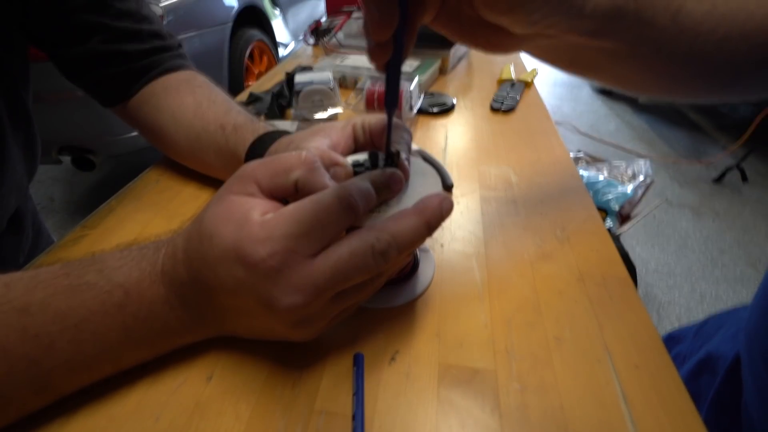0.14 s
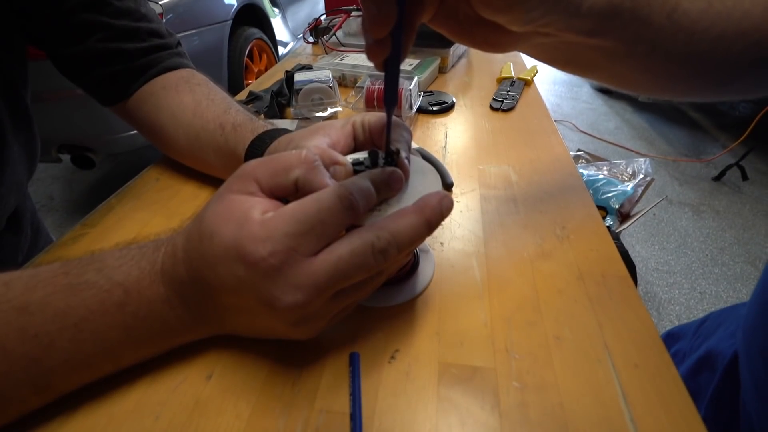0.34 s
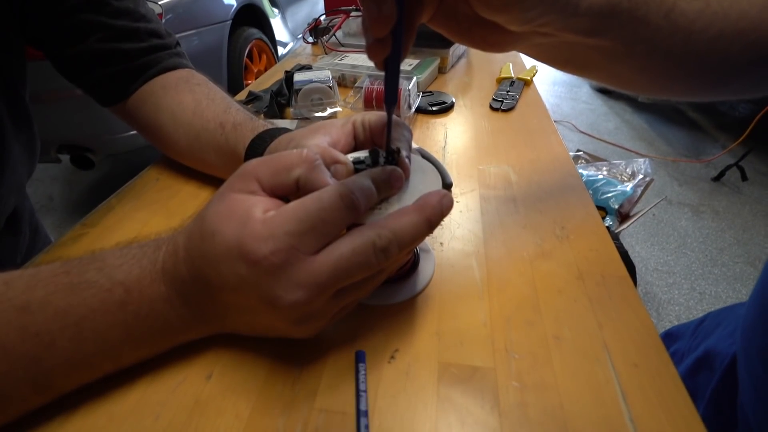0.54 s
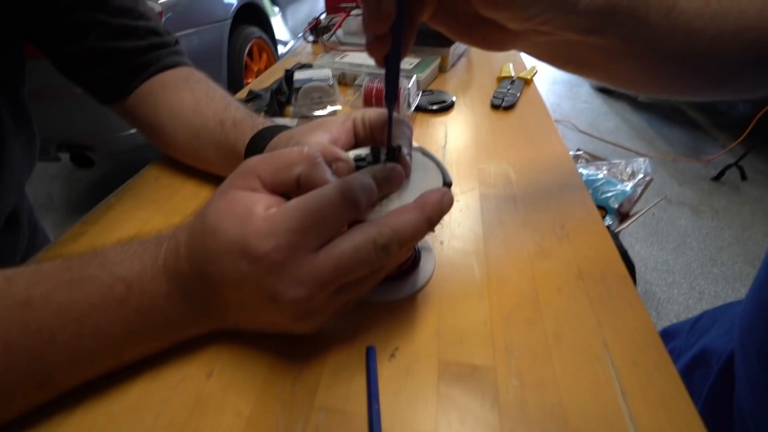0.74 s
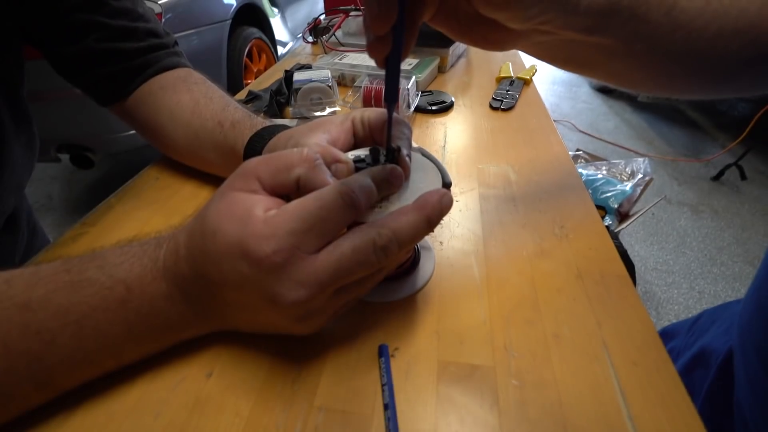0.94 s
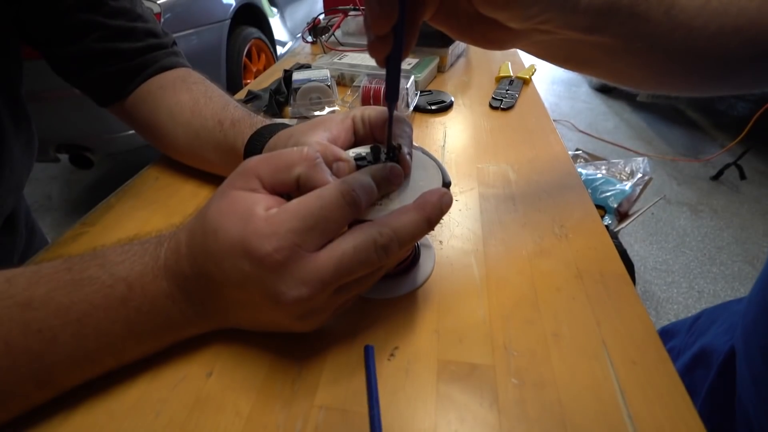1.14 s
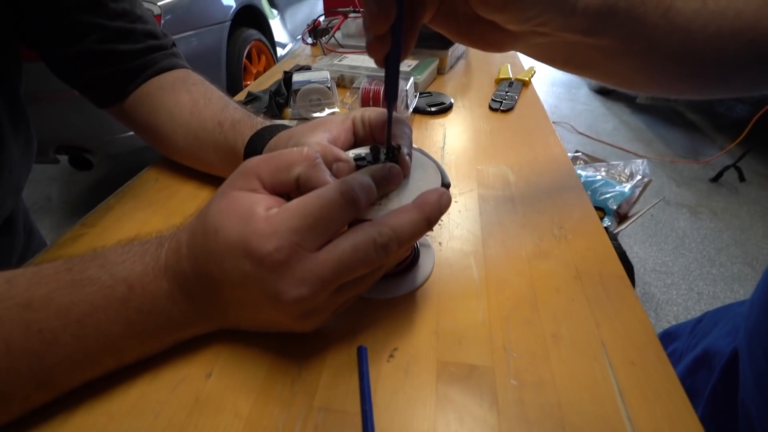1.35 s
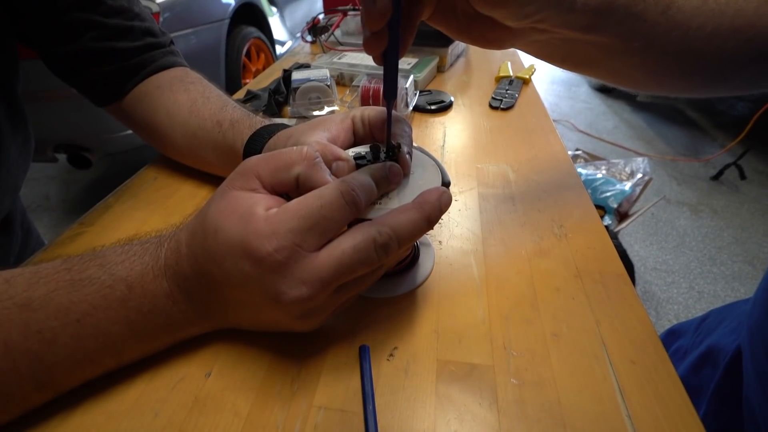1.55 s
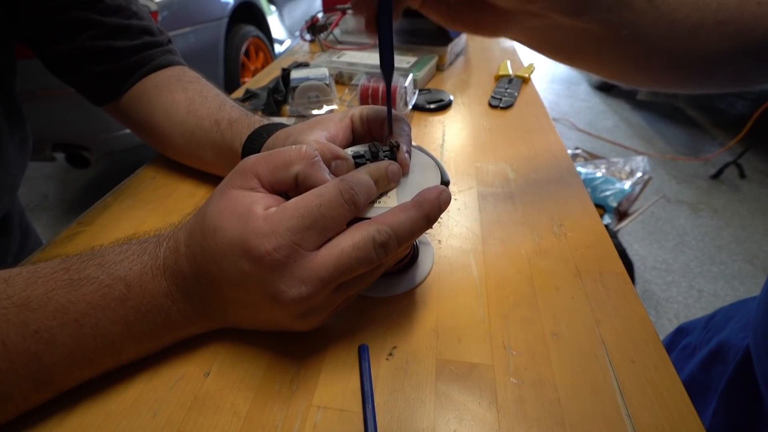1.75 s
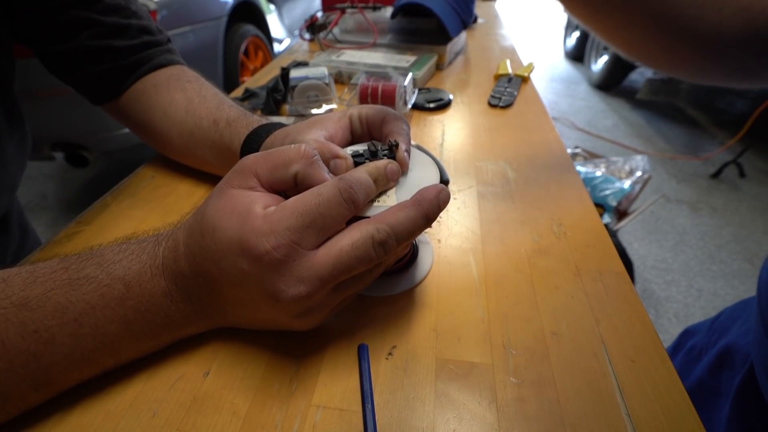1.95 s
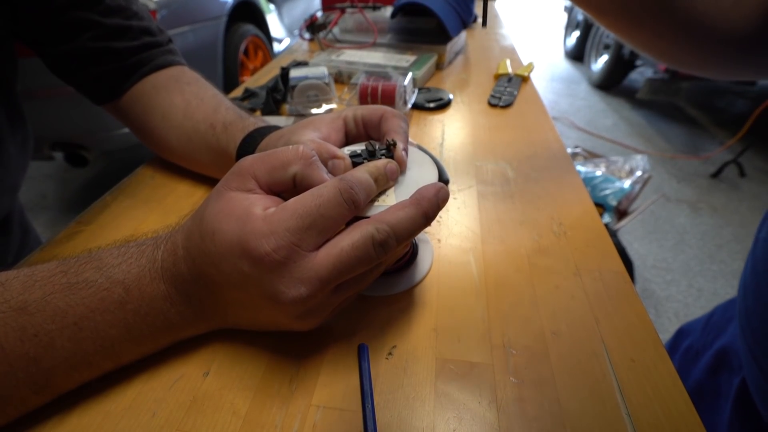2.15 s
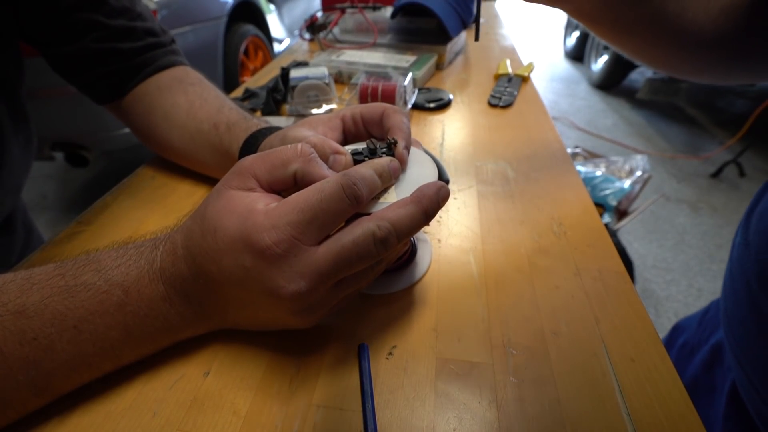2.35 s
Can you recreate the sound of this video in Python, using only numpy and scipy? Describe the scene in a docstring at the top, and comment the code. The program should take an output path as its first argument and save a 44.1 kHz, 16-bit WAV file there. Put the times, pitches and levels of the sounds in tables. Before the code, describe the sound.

A hammer hits a hand-held steel punch five times at an even quick pace, each blow a hard clack with woody bench thump and loose-part rattle, then quiet garage noise; close microphone overloads.

```python
"""Garage, wooden workbench: a hammer taps a steel punch in six quick, nearly even blows.
Bench: damped thump, struck modes and dense noise ring. Punch: short steel modes plus a noise crack.
Hammer: faint beating mode pairs. Loose things: clusters of tiny noise clicks. Bounces: later knocks.
Behind them lie low room noise and a faint hiss. The close microphone overloads: a late limiter
and hard clipping shape the blows. The first blow falls just before the start."""
import sys
import numpy as np
from scipy import signal
from scipy.fft import rfft, irfft
from scipy.io import wavfile

SR = 44100
rng = np.random.default_rng(int(sys.argv[2]) if len(sys.argv) > 2 else 0)


def generate_wav(signal):
    """Clip the signal to [-1, 1] and save it as 16-bit WAV at the path in sys.argv[1]."""
    frames = np.transpose(np.atleast_2d(signal))
    scaled = np.clip(frames, -1, 1) * 32767
    pcm = np.round(scaled).astype(np.int16)
    wavfile.write(sys.argv[1], SR, pcm)


N = 110250
T = np.arange(SR) / SR  # time axis of one struck sound, s

# All mode and spectrum levels are relative; noise spectra are scaled to rms 1.
# Hammer blows: start_s, bench_db, tick_db, rattle_db, ring_held_s, low_ring_db, mid_ring_db, high_ring_db
BLOWS = [(-.095, -2.76, -2, -4, .2, -24, -24, -27), (0.2023, -0.27, 0.5, -3.5, .2, -11, -19, -20),
         (0.4945, 1.2, 2.5, -2, .14, -2, -6.5, -4), (0.7839, 3.16, 5, 0, 0.17, 3, -1, -4),
         (1.0504, 2.26, 6, 0, .3, 2, -1, -10), (1.3544, -1.95, 0.5, -5.5, 0.15, 3, -7, -12)]
# Hammer bounces and small knocks after the blows: start_s, click_db, push_db
BOUNCE_KNOCKS = [(.255, -16, 0), (.5535, 2, 3), (.585, -11, -10), (.863, -1.5, -2), (.918, -11, -8),
                 (1.1255, -4, -1), (1.161, -4, -10), (1.184, -11, -14), (1.208, -14, -12), (1.403, -7, -6),
                 (1.43, -10, -10), (1.468, -16, -18), (2.041, -24, -40)]
# Damped give of stand and bench: freq_hz, level_db, t60_s
THUMP_MODES = [(155.6, -5.5, 0.059), (305, 4, 0.015), (64.5, -5, 0.025), (483, -4, 0.024), (846, -8, 0.062)]
# Bench top modes: freq_hz, level_db, t60_s
BENCH_MODES = [(86, -13, .38), (122, -14, .33), (159, -14, .6), (179, -8, .5), (208, -16, .42),
               (265, -8, .36), (282, -10, .6), (298, -16, .6), (362, -1, .34), (416, -11, .55),
               (445, -8, .38), (476, -13, .4), (502, -11, .45), (541, -13, .42), (591, -10, .38),
               (766, -6, .38), (816, -6.5, .42), (869, -11, .38), (968, -10, .3), (989, -5, .3),
               (1048, -18, .3), (1101, -19, .3)]
# Dense ring of bench and garage: freq_hz, level_db
BODY_SPECTRUM = [(30, -10), (80, 7.5), (160, 0.5), (230, 1), (400, -1), (560, 2), (660, -4), (800, 2.5),
                 (1000, -6), (1200, -13), (1750, -19.5), (2300, -25), (4000, -29), (7000, -36),
                 (11000, -41), (16000, -58)]
# Decay of the dense ring: freq_hz, t60_s
BODY_DECAY = [(80, 0.15), (200, 1), (500, 0.58), (1000, 0.48), (2000, 0.88), (5000, 0.53), (10000, 0.36),
              (16000, 0.53)]
# Short steel modes of the punch: freq_hz, level_db, t60_s
PUNCH_MODES = [(1735, -6, 0.039), (2470, -18.5, 0.042), (3340, -1, 0.0051), (4280, -7, 0.0075),
               (5230, -12.5, 0.0023), (6900, -13.5, 0.003), (9580, -19.5, 0.0046), (13500, -24, 0.0074)]
# Crack and tick scattered from nearby things: freq_hz, level_db
SCATTER_SPECTRUM = [(500, 5), (1700, 13), (4000, -10), (7000, 1.5), (11300, -16.5), (12500, -10),
                    (14000, -2), (16000, -67)]
# Hammer head modes in low, middle and high families: freq_hz, level_db, t60_s
HAMMER_FAMILIES = [
    [(3140, 0, 1.1), (3316, -11, .8)],
    [(6848, 0, 1.6), (6918, -1, 1.6)],
    [(9227, 0, 1.4), (9281, -5, 1.4), (15130, -14, .35)],
]
# Clatter of small loose parts: freq_hz, level_db
CLATTER_SPECTRUM = [(200, -34), (900, 19), (1800, -2.5), (2600, 4.5), (4000, -2), (5500, -6), (9000, -13.5),
                    (12000, -21), (16000, -26)]
# Click of a bounce: freq_hz, level_db
KNOCK_SPECTRUM = [(200, -17), (900, 10.5), (1850, 7), (2600, 0.5), (4000, -7), (6000, -17.5), (9000, -53),
                  (16000, -40)]
# Garage background: freq_hz, level_db
FLOOR_SPECTRUM = [(15, -50), (25, -26), (43, -8), (161, -2), (293, -9.5), (394, -13.5), (427, -9.5),
                  (545, -6), (863, -13.5), (1020, -12.5), (1480, -19.5), (4370, -33), (16000, -54.5)]
# Garage background envelope: time_s, level_db
FLOOR_ENVELOPE = [(0, -40), (1.5, -40.5), (1.85, -43.5), (2.101, -43.5), (2.25, -42), (2.5, -42)]
# Faint hiss: freq_hz, level_db
HISS_SPECTRUM = [(800, -81), (2500, 28.5), (5000, 20), (8000, 19.5), (10000, 8.5), (16000, -18)]
# Hiss envelope: time_s, level_db
HISS_ENVELOPE = [(0, -55.5), (.45, -58), (1.2, -54), (1.7, -76)]

THUMP_GAIN_DB, MODES_GAIN_DB, BODY_GAIN_DB = 1.5, -12, -13.5
BENCH_DELAY_S, MODES_RISE_S = .001, .0095
BODY_CHANGE = .7  # amplitude share of the dense ring that is new at each blow
TICK_GAIN_DB = -13.5
CRACK_GAIN_DB, CRACK_T60_S = -11.5, .0024
SCATTER_GAIN_DB, SCATTER_T60_S = -22, .035
HAMMER_GAIN_DB = -46
LIFT_S, LIFT_START_GAIN, SWING_AWAY_T60_S = .125, .18, .42
RATTLE_GAIN_DB, RATTLE_SCATTER_DB = -27.5, 3.5  # per part
RATTLE_AFTER_S, RATTLE_SPREAD_S = .042, .0068  # time in the air and its spread
RATTLE_RISE_S, RATTLE_T60_S = .00013, .018
KNOCK_GAIN_DB, KNOCK_RISE_S, KNOCK_T60_S = -13, .00058, .027
PUSH_GAIN_DB, LIGHT_PUSH_HZ = -20, 920  # bench hardly answers a light push below this
LIMIT_DB, LIMIT_SHARE = -7, .58  # threshold; ducked share of the overshoot in dB
HELD_LEVEL_FALL_DB_PER_S = 234
CLIP_LEVEL, LOW_CUT_HZ, EDGE_HZ = 1, 35, 15800


def amp(db):
    """Decibels to gain."""
    return 10 ** (np.asarray(db) / 20)


def unit(x):
    """Scales to rms 1."""
    return x / np.sqrt(np.mean(x ** 2) + 1e-20)


def read(points, hz):
    """Interpolates a table along a log-frequency axis."""
    f, value = np.transpose(points)
    return np.interp(np.log(hz + 1), np.log(f + 1), value)


def add(mix, start_s, sound):
    """Mixes in a sound at start_s, which may lie before the start."""
    at = round(start_s * SR)
    sound = sound[max(-at, 0):]
    part = mix[max(at, 0):][:len(sound)]
    part += sound[:len(part)]


def noise(spectrum, size):
    """Filters white noise to a spectrum, rms 1."""
    bins = rfft(rng.standard_normal(size))
    hz = np.fft.rfftfreq(size, 1 / SR)
    return unit(irfft(bins * amp(read(spectrum, hz)), size))


def dying(t_s, t60_s):
    """Exponential decay, 60 dB in t60_s."""
    return np.exp(-np.log(1000) * t_s / t60_s)


def ring(modes):
    """Sums decaying sines of alternating polarity."""
    out = np.zeros(SR)
    for k, (hz, level_db, t60_s) in enumerate(modes):
        out += (-1) ** k * amp(level_db) * dying(T, t60_s) * np.sin(2 * np.pi * hz * T)
    return out


def dense_ring():
    """Countless weak modes of bench and room as noise, each band dying at its own speed."""
    hz, t_s, bands = signal.stft(noise(BODY_SPECTRUM, SR), SR, nperseg=512)
    decay = dying(t_s, read(BODY_DECAY, hz)[:, None])
    return signal.istft(bands * decay, SR, nperseg=512)[1][:SR]


def bench():
    """Each blow pushes the same spot: a thump, then modes build up with a partly new dense ring."""
    thump = amp(THUMP_GAIN_DB) * ring(THUMP_MODES)
    modes = amp(MODES_GAIN_DB) * ring(BENCH_MODES) * (1 - np.exp(-T / MODES_RISE_S))
    same_share = np.sqrt(1 - BODY_CHANGE ** 2)  # keeps total power
    same = thump + modes + amp(BODY_GAIN_DB) * same_share * dense_ring()
    out = np.zeros(N)
    for start_s, bench_db, *_ in BLOWS:
        fresh = amp(BODY_GAIN_DB) * BODY_CHANGE * dense_ring()
        add(out, start_s + BENCH_DELAY_S, amp(bench_db) * (same + fresh))
    return out


def punch():
    """Steel meets hand-damped steel: a tick, a short noise crack at the thump's start, and their scatter."""
    out = np.zeros(N)
    tick = amp(TICK_GAIN_DB) * ring(PUNCH_MODES)
    crack = amp(CRACK_GAIN_DB) * dying(T, CRACK_T60_S)
    scatter = amp(SCATTER_GAIN_DB) * dying(T, SCATTER_T60_S)
    for start_s, _, tick_db, *_ in BLOWS:
        add(out, start_s, amp(tick_db) * tick)
        burst = (crack + scatter) * noise(SCATTER_SPECTRUM, SR)
        add(out, start_s + BENCH_DELAY_S, amp(tick_db) * burst)
    return out


def hammer():
    """Close head modes beat, swelling as the head lifts and fading as it swings away."""
    out = np.zeros(N)
    families = np.array([ring(modes) for modes in HAMMER_FAMILIES])
    lift = LIFT_START_GAIN + (1 - LIFT_START_GAIN) * np.minimum(T / LIFT_S, 1) ** 2
    for start_s, _, _, _, held_s, *ring_db in BLOWS:
        away = dying(np.maximum(T - held_s, 0), SWING_AWAY_T60_S)
        head = amp(ring_db) @ families
        add(out, start_s, amp(HAMMER_GAIN_DB) * head * lift * away)
    return out


def click(spectrum, rise_s, t60_s):
    """Small damped impact: decaying noise with a soft start."""
    t_s = T[:4096]
    soft_start = 1 - np.exp(-(t_s / rise_s) ** 2)
    return noise(spectrum, 4096) * dying(t_s, t60_s) * soft_start


def knocks():
    """Later knocks: a click and a light push on the upper bench modes."""
    out = np.zeros(N)
    high_pass = signal.butter(2, LIGHT_PUSH_HZ, "high", fs=SR)
    upper_modes = signal.lfilter(*high_pass, ring(BENCH_MODES))
    for start_s, click_db, push_db in BOUNCE_KNOCKS:
        impact = click(KNOCK_SPECTRUM, KNOCK_RISE_S, KNOCK_T60_S)
        add(out, start_s, amp(KNOCK_GAIN_DB + click_db) * impact)
        add(out, start_s, amp(PUSH_GAIN_DB + push_db) * upper_modes)
    return out


def rattle():
    """Small parts jump at each blow and land in a dense cluster of 36 clicks."""
    out = np.zeros(N)
    for start_s, _, _, rattle_db, *_ in BLOWS:
        for late, size in rng.standard_normal((36, 2)):
            gain = amp(RATTLE_GAIN_DB + rattle_db + RATTLE_SCATTER_DB * size)
            land_s = start_s + RATTLE_AFTER_S + RATTLE_SPREAD_S * late
            add(out, land_s, gain * click(CLATTER_SPECTRUM, RATTLE_RISE_S, RATTLE_T60_S))
    return out


def background(spectrum, envelope):
    """Steady shaped noise under a slow level envelope."""
    level_db = np.interp(np.arange(N) / SR, *np.transpose(envelope))
    return noise(spectrum, N) * amp(level_db)


def garage():
    """Low room noise and a faint hiss, both shaped noise."""
    room = background(FLOOR_SPECTRUM, FLOOR_ENVELOPE)
    hiss = background(HISS_SPECTRUM, HISS_ENVELOPE)
    return room + hiss


def scene():
    """Sums all sources at one microphone."""
    return (bench() + punch() + hammer() + knocks() + rattle() + garage())[None]


def limiter_gain(x):
    """Peak-held smoothed power above the threshold ducks the level, slightly late."""
    power = signal.lfilter([1 / 200], [1, 1 / 200 - 1], x ** 2)
    fall_db = np.arange(N) / SR * HELD_LEVEL_FALL_DB_PER_S
    # running peak on a rising ramp = peak hold with a linear dB fall
    held_db = np.maximum.accumulate(10 * np.log10(power + 1e-12) + fall_db) - fall_db
    over_db = np.maximum(held_db - LIMIT_DB, 0)
    duck_db = LIMIT_SHARE * signal.lfilter([1 / 300], [1, 1 / 300 - 1], over_db)
    return amp(-duck_db)


def record(dry):
    """Limiter, hard clip, low cut, second clip, band limit."""
    clipped = np.clip(dry * limiter_gain(dry[0]), -CLIP_LEVEL, CLIP_LEVEL)
    low_cut = signal.lfilter(*signal.butter(1, LOW_CUT_HZ, "high", fs=SR), clipped)
    band_limit = signal.firwin(511, EDGE_HZ, window=("kaiser", 9), fs=SR)
    return signal.oaconvolve(np.clip(low_cut, -1, 1), band_limit[None], "same")


dry = scene()
out = record(dry)
generate_wav(out)
```